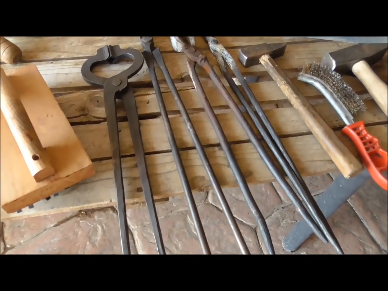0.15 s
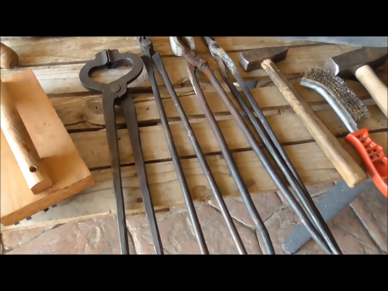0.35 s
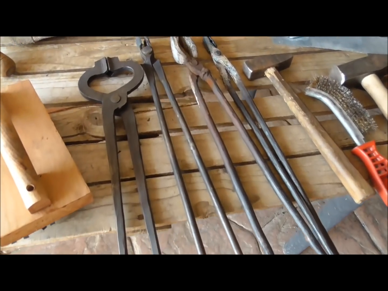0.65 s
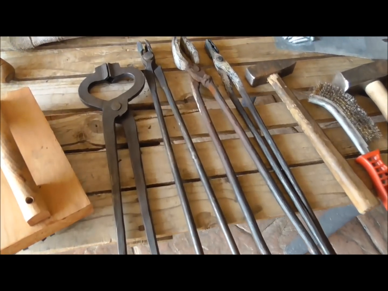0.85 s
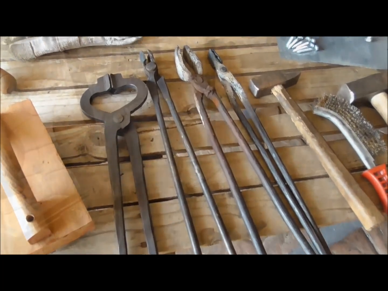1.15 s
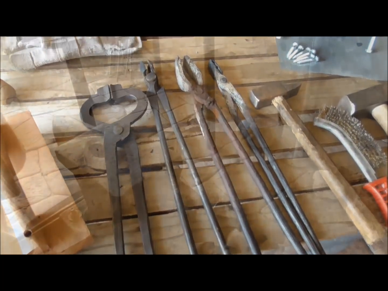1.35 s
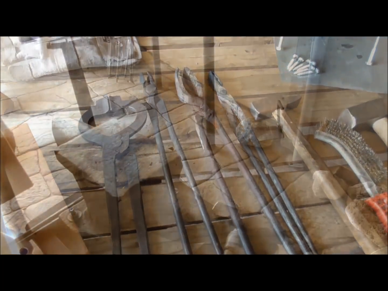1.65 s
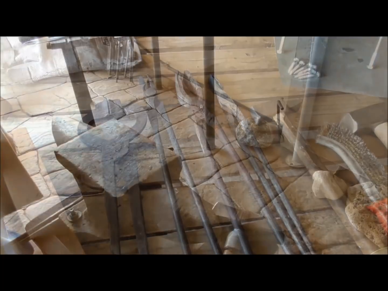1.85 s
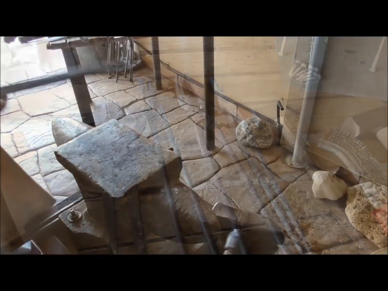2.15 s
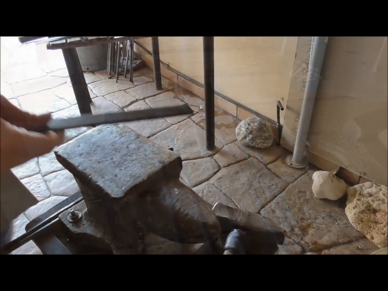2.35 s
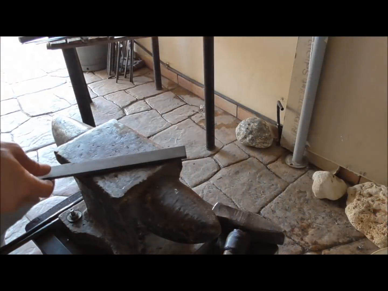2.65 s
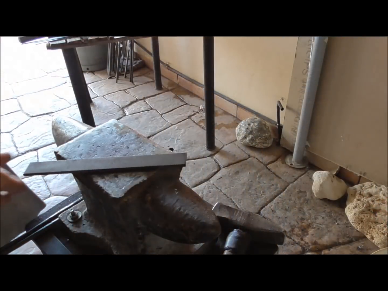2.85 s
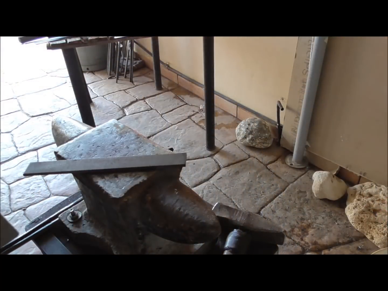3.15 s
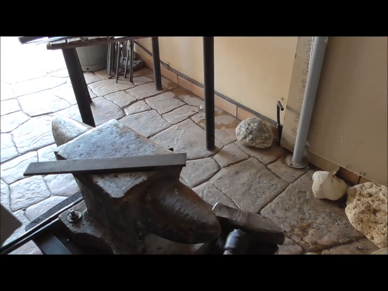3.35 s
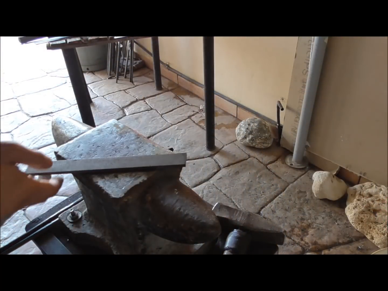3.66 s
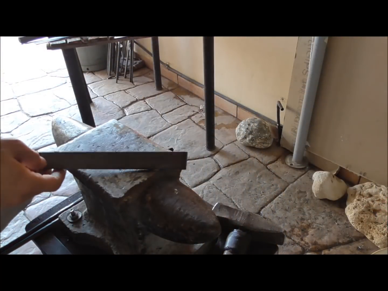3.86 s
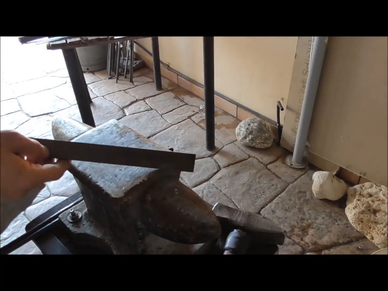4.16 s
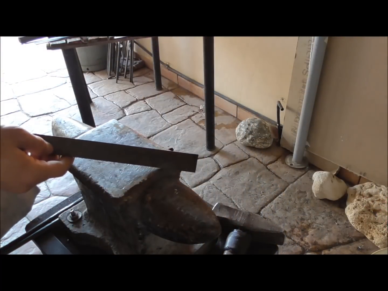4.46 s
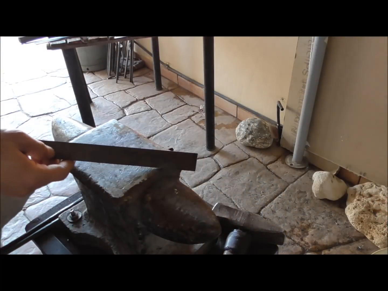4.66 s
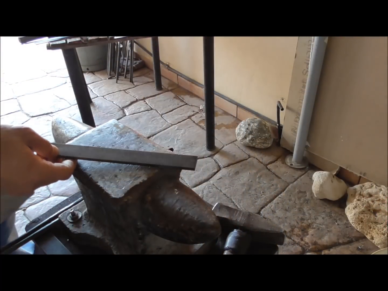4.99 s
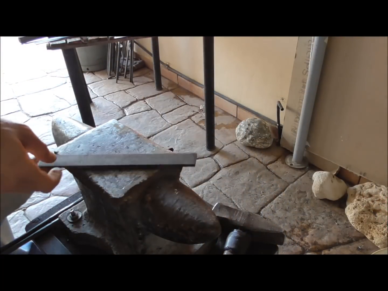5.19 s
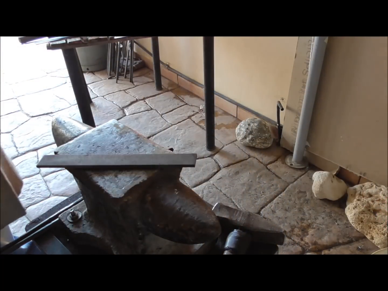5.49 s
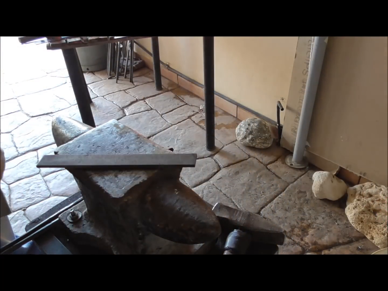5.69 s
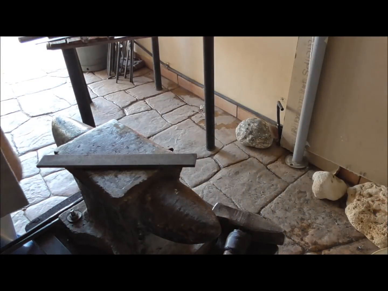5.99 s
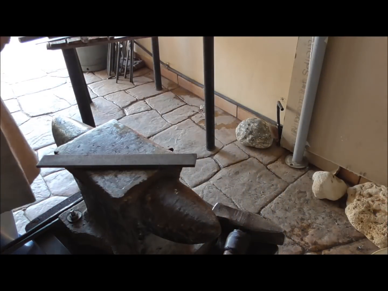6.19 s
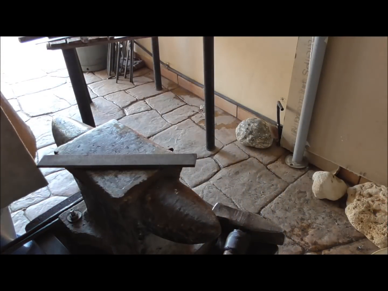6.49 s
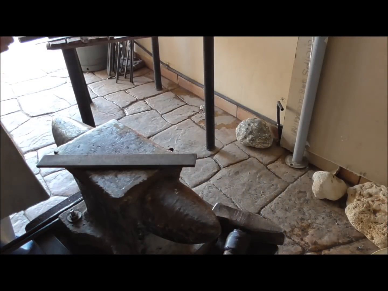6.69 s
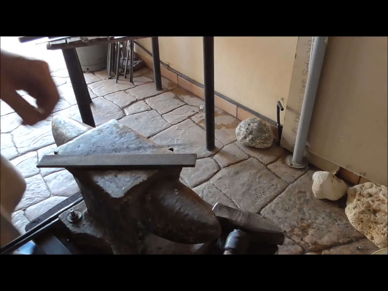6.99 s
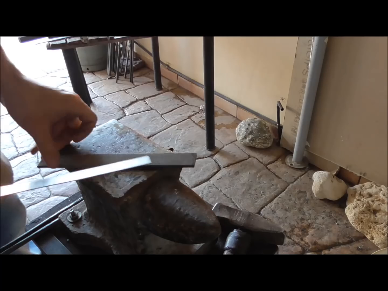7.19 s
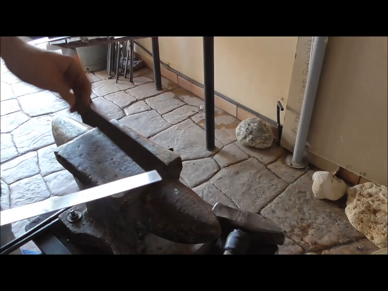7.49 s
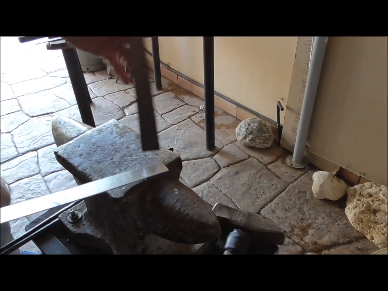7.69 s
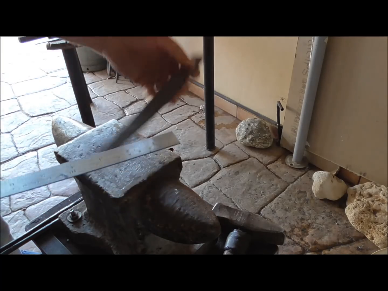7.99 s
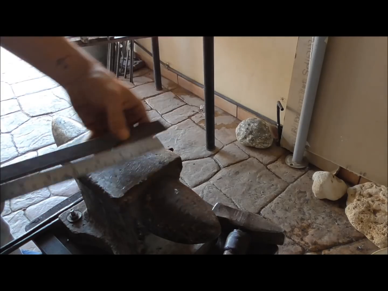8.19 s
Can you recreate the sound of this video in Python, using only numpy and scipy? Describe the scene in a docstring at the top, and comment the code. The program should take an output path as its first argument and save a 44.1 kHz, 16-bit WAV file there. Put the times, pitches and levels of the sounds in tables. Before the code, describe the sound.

A gas forge burner roars throughout, a thick low rush mostly between 150 and 500 Hz, with a thin jet hiss above and slight flutter. Soft, barely noticeable low thumps fall in the first 2.6 s. At 1.05 to 1.45 s loose metal tools knock and rattle, with a bright, high jingle. From about 1.1 s a second view of the roar, beside the anvil, fades in and thickens the sound; the bench view cuts off at 2.55 s. At 2.59 s a flat steel bar lands with a sharp, bright, short ring and chatter to 2.7 s, while the roar dips briefly and recovers. Faint taps come at 3.8 and 5.0 s, small clinks and slides at 5.3 to 5.4 s, a weak loose-metal knock near 6.0 s, a tiny roar dip at 6.6 s, then quiet scrapes and touches from 7.3 to 7.75 s. The roar continues to the end.

```python
"""A gas forge burner roars and hisses in a stone-floored workshop, built from shaped noise with slow level flicker.
It is heard from two spots: by the tool bench, then by the anvil, which fades in before the bench is cut off.
Loose metal knocks and rattles as noise bursts and ringing grit, mostly early on and once more near 6 s; soft
low thumps fall in the first seconds. A flat steel bar is laid, turned and slid on the anvil: its modes ring when
struck and when shaken by grit. The roar dips briefly around the first clink, and very slightly once more later."""
import sys
import numpy as np
from scipy import signal
from scipy.fft import rfft, irfft, next_fast_len
from scipy.io import wavfile

SR = 44100
rng = np.random.default_rng(int(sys.argv[2]) if len(sys.argv) > 2 else 0)


def to_wav(s):
    """Save 16-bit WAV."""
    ch = np.atleast_2d(s).T  # columns
    pcm = np.round(np.clip(ch, -1, 1) * 32767)  # PCM
    wavfile.write(sys.argv[1], SR, pcm.astype(np.int16))


N = 367794


def from_db(db):
    """Gain of a level in dB."""
    return 10 ** (np.asarray(db) / 20)


def rms_one(x):
    """Scales a sound to rms 1."""
    return x / np.sqrt(np.mean(x ** 2) + 1e-20)


def at_hz(points, hz):
    """Reads a curve drawn as straight lines on a log-frequency axis."""
    curve_hz, value = np.array(points).T
    return np.interp(np.log(hz), np.log(curve_hz), value)


def drift(rate):
    """Slow random wander of spread 1: noise low-passed at rate [Hz], made at every 40th sample."""
    r = np.exp(-2 * np.pi * rate * 40 / SR)
    noise = rng.standard_normal(N // 40 + 2002)
    slow = signal.lfilter([1], [1, -2 * r, r * r], noise)[2000:]  # drops the filter's start-up
    return np.interp(np.arange(N) / 40, np.arange(len(slow)), rms_one(slow))


def resonance(x, hz, width):
    """Two-pole resonance of a given width [Hz], gain close to 1 at its top."""
    r = np.exp(-np.pi * width / SR)
    feedback = [1, -2 * r * np.cos(2 * np.pi * hz / SR), r * r]
    return signal.lfilter([(1 - r * r) / 2, 0, (r * r - 1) / 2], feedback, x)


def grains(per_s, spread_db):
    """Random contacts of uneven size and either sign, independent in each channel; rms 1."""
    size_db = spread_db * np.minimum(rng.exponential(1, (2, N)), 5)
    sizes = from_db(size_db) * rng.choice([-1, 1], (2, N))
    return rms_one(sizes * (rng.random((2, N)) < per_s / SR) + 1e-9)


def strokes(start, length, level_db, rise, fall):
    """Level [dB] of each event at every sample: straight rise, hold, straight fall [dB per s]."""
    t, start, end = np.arange(N) / SR, np.c_[start], np.c_[start + length]
    return np.c_[level_db] - rise * np.maximum(start - t, 0) - fall * np.maximum(t - end, 0)


def add(out, at_s, piece):
    """Mixes a short sound in at a time [s]."""
    i = round(at_s * SR)
    out[:, i:i + piece.shape[-1]] += piece[..., :N - i]


# how alike left and right are: (frequency [Hz], correlation [1 = identical])
STEREO_LIKENESS = [(60, 0.85), (130, 0.97), (290, 0.97), (640, 0.91), (1410, 0.68), (3100, 0.65),
                   (6820, .4), (15000, 0.1)]


def coloured(spectrum, echoes=(), wet=0):
    """Stereo noise of a given spectrum, coloured by echo bands and a room tail, less alike in the treble; rms 1."""
    size = next_fast_len(N)
    hz = np.maximum(np.arange(size // 2 + 1) * SR / size, 1)
    level_db = at_hz(spectrum, hz)
    for echo_hz, width, echo_db in echoes:
        level_db = level_db + echo_db / (1 + (2 * (hz - echo_hz) / width) ** 2)
    # the room's dense tail ripples the upper spectrum finely
    tail_t = np.arange(SR // 4) / SR
    tail = rng.standard_normal((2, SR // 4)) * from_db(-60 * tail_t / 0.21)
    tail_spectrum = rfft(rms_one(tail), size) / np.sqrt(SR // 4)
    room = 1 + wet * tail_spectrum / (1 + (1300 / hz) ** 4)
    mid, side = rfft(rng.standard_normal((2, size))) * from_db(level_db) * room
    alike = np.clip(at_hz(STEREO_LIKENESS, hz), 0, 1)
    stereo = np.sqrt(1 + alike) * mid + np.sqrt(1 - alike) * side * [[1], [-1]]
    return rms_one(irfft(stereo, size)[:, :N])


# soft low thumps: (time [s], level before decay [dB])
LOW_THUMPS = [(0.199, -49), (0.369, -43), (0.539, -49), (1.054, -31), (1.478, -49), (2.27, -40),
              (2.549, -41)]


def thumps():
    """Soft low pushes: short dying 45 Hz tones, the same in both channels."""
    out, t = np.zeros((2, N)), np.arange(SR // 10) / SR
    for s, level_db in LOW_THUMPS:
        add(out, s, from_db(level_db) * np.sin(2 * np.pi * 45 * t) * from_db(-60 * t / .06))
    return out


# high ringing of small loose parts: (frequency [Hz], width [Hz], relative level [dB])
RATTLE_MODES = [(9600, 38, -11), (10200, 72, -4), (10500, 35, 9), (10900, 30, 10), (11300, 34, -1),
                (11400, 42, -8), (11900, 33, -7), (12300, 53, -6), (12200, 41, -11), (13100, 27, 1),
                (13500, 64, -10), (14000, 60, -10), (14400, 54, -11), (15000, 48, -18)]
# broad noise colour of the loose metal: (frequency [Hz], relative level per Hz [dB])
RATTLE_BODY = [(530, -22), (900, 2), (1780, -1.5), (2420, -7.5), (4390, -5.5), (6200, -8), (9080, -5.5),
               (11000, -15), (15500, -12)]
# bursts of rattle among the knocks: (start [s], length [s], ringing level [dB], broad level [dB])
RATTLE_BURSTS = [(1.064, .03, -43, -39.5), (1.128, .045, -37, -39), (1.19, .03, -35.5, -34),
                 (1.24, .09, -31.5, -39.5), (1.345, .07, -39, -44), (1.434, .03, -33, -44),
                 (6.002, .003, -41, -53)]
# knocks: (time [s], bright band level [dB], middle band re bright [dB], wooden body re bright [dB], t60 [s])
METAL_KNOCKS = [(1.052, -66, 22, 18, 0.12), (1.059, -35, -8, -12, 0.21), (1.1196, -31, -3, -4, 0.2),
                (1.131, -42, 3, 8, .16), (1.1804, -42, 9, 7, 0.17), (1.4306, -46, 2, -33, 0.13),
                (5.928, -53, -4, -20, 0.2), (5.9863, -53, -12, -20, 0.08), (6.0035, -44, -1, -24, 0.14)]
RATTLE_RISE_DB_PER_S, RING_FALL_DB_PER_S, BROAD_FALL_DB_PER_S = 700, 190, 143
LOOSE_WIDE = 0.16   # share of the opposite channel subtracted, which widens the high rattle


def loose_metal():
    """Knocks that die as noise, and a dense rattle of small parts ringing high."""
    grit = grains(3300, 2.3)
    ringing = rms_one(sum(from_db(db) * rms_one(resonance(grit, hz, width)) for hz, width, db in RATTLE_MODES))
    # the smallest parts blur into a wide bright band
    blur = rms_one(resonance(resonance(grit, 11300, 4000), 11300, 4000))
    ringing = rms_one(ringing + 1.1 * blur)
    ringing = rms_one(ringing - LOOSE_WIDE * ringing[::-1])
    broad = coloured(RATTLE_BODY)
    start, length, ring_db, broad_db = np.transpose(RATTLE_BURSTS)
    ring_db = strokes(start, length, ring_db, RATTLE_RISE_DB_PER_S, RING_FALL_DB_PER_S).max(axis=0)
    broad_db = strokes(start, length, broad_db, RATTLE_RISE_DB_PER_S, BROAD_FALL_DB_PER_S).max(axis=0)
    out = from_db(ring_db) * ringing + from_db(broad_db) * broad
    t = np.arange(SR // 2) / SR
    for s, level_db, middle_db, wood_db, t60 in METAL_KNOCKS:
        noise = rng.standard_normal((2, len(t)))
        bright = rms_one(resonance(resonance(noise, 10000, 4200), 10000, 4200))
        middle = from_db(middle_db) * rms_one(resonance(noise, 4600, 4500))
        wood = from_db(wood_db) * rms_one(resonance(resonance(noise[0], 1210, 800), 1210, 800))
        snap = 1 + .9 * from_db(-60 * t / 0.025)   # extra weight on the attack
        decay = from_db(level_db - 60 * t / max(t60, .01))
        add(out, s, decay * snap * (bright + middle + wood))
    return out


# pitch of each mode of the steel bar: (frequency [Hz])
BAR_MODE_HZ = [1190, 2406, 3962, 4780, 5922, 6150, 7273, 8199, 9841, 10850, 12550, 13850, 15340]
# family of each mode: 0 bending with a still middle, 1 bending with a moving middle, 2 twisting,
# 3 the two lowest, 4 low twisting, 5 edgewise bending, 6 high twisting: (family [index])
BAR_MODE_FAMILY = [3, 3, 0, 4, 1, 5, 2, 0, 2, 1, 6, 0, 6]
# one row per mode: (struck level [dB], free t60 [s], twin mode above by [Hz], rubbed level [dB])
BAR_MODES = [(-8, 0.32, 8.1, -7), (-2, 0.3, 16, -4), (-1, 0.38, 26, 3), (-2, 0.12, 11, -12),
             (-11, 0.58, 20.5, -3), (-9, .15, 23, -12), (-10, 0.17, 13, -8), (-3.5, 0.41, 21, -3.5),
             (-13.5, 0.2, 17, -5), (-6, 0.15, 29, -4.5), (-16, 0.15, 19, -5), (-29, .2, 22, -19),
             (-31, 0.2, 30, -22)]
# bar slides on the anvil face: (start [s], length [s], level [dB], brightness [dB per octave],
# moving-middle modes [dB], twisting modes [dB], two lowest modes [dB], low twisting mode [dB],
# edgewise mode [dB], high twisting modes [dB])
BAR_SLIDES = [(2.618, 0.077, -44, 0, -6, -5, -13, -6, 2, -9),
              (5.307, .03, -57, 8, -10, -2, -6, -6, -10, -6), (5.394, 0.03, -55, 8, -12, 0, 2, 3, -8, -4),
              (7.29, 0.09, -66, 0, 0, 5, -6, 0, 0, 6), (7.39, 0.02, -58, 0, 0, 2, -4, -4, -4, -10),
              (7.432, 0.04, -55, 3, -4, 9, 6, 2, 4, -4), (7.5, 0.04, -63, -4, 2, 6, -8, -4, 10, -6),
              (7.6, .04, -66, 0, 2, 0, -6, -4, 12, -6), (7.67, 0.08, -55, 12, 4, -7, 14, 8, -2, -12)]
SLIDE_RISE_DB_PER_S, SLIDE_FALL_DB_PER_S = 504, 322
BRIGHT_TOP_HZ = 12500   # brightness tilts the modes around 8 kHz, up to here


def slides():
    """Grit under the bar shakes its modes, each flickering unevenly, and they ring on briefly."""
    grit, rings = grains(2500, 1.0), 0
    start, length, slide_db, *colour = np.transpose(BAR_SLIDES)
    each_db = strokes(start, length, slide_db, SLIDE_RISE_DB_PER_S, SLIDE_FALL_DB_PER_S)
    level_db = each_db.max(axis=0)
    # the loudest slide at each moment sets the colour
    bright_db, *family_db = np.array(colour)[:, each_db.argmax(axis=0)]
    shaken = from_db(level_db) * (grit[0] + .5 * grit)
    for hz, family, (_, t60, _, rubbed_db) in zip(BAR_MODE_HZ, BAR_MODE_FAMILY, BAR_MODES):
        width = 12.0 / t60   # wider than the free mode, so it dies sooner
        spot_db = (0, *family_db)[family] + bright_db * np.log2(min(hz, BRIGHT_TOP_HZ) / 8000)
        flicker_db = 2.5 * drift(8)
        push = shaken * from_db(rubbed_db + spot_db + flicker_db)
        rings = rings + resonance(push, hz, width) * np.sqrt(SR / width)
    scrape = resonance(shaken, 6500, 5000)
    return 0.34 * rings + 0.17 * scrape


# bar meets anvil: (time [s], level [dB], brightness [dB per octave], ring time left by the grip [share],
# moving-middle modes [dB], twisting modes [dB], two lowest modes [dB], low twisting mode [dB],
# edgewise mode [dB], high twisting modes [dB], crack level [dB], crack pitch [Hz])
BAR_CLINKS = [(2.589, -21, 11, 0.7, -5.5, -6, -4, 1, -8, -8, 12, 5400),
              (2.631, -36, 7, 0.6, 2, -6, -6, -12, 0, -12, 10, 8000),
              (2.663, -42, 3, .5, -4, -8, -8, -3, 2, -5, 16, 6500),
              (2.675, -46, 0, .5, -2, -8, -10, -8, 0, -10, 15, 6500),
              (2.684, -36, 9, 0.45, -20, -10, -14, -12, -12, -16, 5, 7500),
              (3.824, -51, 6, 0.2, -16, -10, -15, -12, -10, -8, 2, 8000),
              (3.846, -60, 6, .2, -8, 4, -12, 0, -6, 18, 8, 12500),
              (5.014, -47, -5, 0.3, 3, 8, -14, -10, 0, 0, 0, 5400),
              (5.303, -54, 6, .3, -12, -3, -15, -8, -12, -8, 0, 8000),
              (5.326, -44, 3, 0.18, -12, 2, 2, -12, -12, 20, -2, 12000),
              (5.342, -55, -10, 0.33, -8, 13, -12, -8, -10, 16, 0, 5400),
              (5.398, -51, 10, 0.36, -12, 6, -6, 4, -8, 5, 2, 8000),
              (5.43, -52, -6, 0.22, -12, -10, -12, -15, -12, -15, -3, 5400),
              (7.287, -53, 3, 0.15, -4, 6, -20, -2, 2, 19, 9, 8000),
              (7.295, -60, -6, 0.2, -8, -4, -20, -8, -8, 0, 2, 5400),
              (7.355, -63, 6, .25, 0, 8, 14, 12, 0, 32, 12, 12500),
              (7.417, -54, -3, 0.22, 14, 4, 4, -10, 6, -8, 12, 5400),
              (7.46, -58, 0, 0.42, 0, 11, 16, -2, 8, -4, 2, 5400),
              (7.55, -60, -10, .25, -8, -8, -10, -2, 2, -8, 0, 5400),
              (7.659, -52, -4, 0.3, 4, -4, -12, -8, 0, -12, 2, 5400),
              (7.748, -58, 0, 0.35, 10, 6, 0, 4, -4, 26, 6, 11500)]
LIGHT_DB = -44   # touches below this level count as light
PRESS_DETUNE = .002   # relative spread: hand and anvil pull each mode off pitch at every light touch


def clinks():
    """Each touch cracks and rings every mode of the bar, which beats with a close twin as it dies."""
    out, t = np.zeros((2, N)), np.arange(SR // 4) / SR
    hz = np.c_[BAR_MODE_HZ]
    mode_db, t60, split_hz, _ = np.array(BAR_MODES).T[:, :, None]
    count = len(BAR_MODES)
    for s, level_db, bright_db, grip, *family_db, crack_db, crack_hz in BAR_CLINKS:
        tilt_db = bright_db * np.log2(np.minimum(hz, BRIGHT_TOP_HZ) / 8000)
        spot_db = np.c_[[0, *family_db]][BAR_MODE_FAMILY] + tilt_db
        strength = from_db(mode_db + spot_db + 1.5 * rng.standard_normal((2, count, 1)))
        # start phase in turns, close but not equal in the two channels
        turn = rng.random((2, count, 1))
        turn = turn[0] + .25 * turn
        detune = PRESS_DETUNE * (level_db < LIGHT_DB) * rng.standard_normal((count, 1))
        pitch = hz * (1 + detune)
        mode = np.sin(2 * np.pi * (pitch * t + turn))
        twin = np.sin(2 * np.pi * ((pitch + split_hz) * t + turn) + 0.81)
        decay = from_db(-60 * t / (t60 * max(grip, .05)))
        rings = np.sum(strength * decay * (mode - 0.63 * twin), axis=1)
        noise = rng.standard_normal((2, len(t)))
        crack = 1.3 * resonance(resonance(noise, crack_hz, 4000), crack_hz, 4000)
        # snap, then a noisy tail in the room
        crack = crack * (from_db(-60 * t / 0.014) + 0.088 * from_db(-60 * t / 0.21))
        add(out, s, from_db(level_db) * (rings + from_db(crack_db) * crack))
    return out


# the level at the anvil dips: (time the dip is deepest [s], depth [dB], hold [s])
ANVIL_DIPS = [(2.595, 13.5, 0.061), (6.643, 2, 0.022)]
DIP_FALL_S, DIP_RECOVER_S = 0.011, 0.083   # length of the fall, time constant of the recovery
FADE_IN_S, FADE_TIME_S = 1.06, 0.26   # fade-in start, time constant


def anvil_gain():
    """Fades the anvil spot in towards 1; each dip falls fast, holds and recovers."""
    t = np.arange(N) / SR
    gain = 1 - np.exp(-np.maximum(t - FADE_IN_S, 0) / FADE_TIME_S)
    for s, depth_db, hold in ANVIL_DIPS:
        fall = np.clip(1 + (t - s) / DIP_FALL_S, 0, 1)
        recovery = np.exp(-np.maximum(t - s - hold, 0) / DIP_RECOVER_S)
        gain = gain * from_db(-depth_db * fall * recovery)
    return gain


# flame roar at the anvil: (frequency [Hz], relative level per Hz [dB])
ANVIL_ROAR_SPECTRUM = [(15, -84.5), (25, -50), (80, -40.5), (121, -12.5), (181, -7), (220, -3), (331, 1),
                       (470, -6), (518, -23.5), (605, -21.5), (735, -29.5), (1340, -35.5), (2600, -57.5),
                       (3380, -56.5), (5720, -120)]
# jet hiss at the anvil: (frequency [Hz], relative level per Hz [dB])
ANVIL_HISS_SPECTRUM = [(700, -11), (1300, 8), (1700, 1), (2200, -7.5), (2900, -9), (4000, -6), (5000, -10),
                       (6200, -14), (8000, -12), (10000, -9), (12000, -12.5), (13500, -17), (14500, -20),
                       (15800, -24)]
# echoes cancel or lift narrow bands at the anvil: (frequency [Hz], width [Hz], change [dB])
ANVIL_ECHO_BANDS = [(70, 15, 8.5), (170.6, 8.1, -1), (188.5, 9.6, 5.5), (223, 11.8, -11.5), (346, 17, -1),
                    (366, 7.7, -4), (442.5, 14.5, -18.5), (470, 19, -0.5), (556, 31, -0.5), (589, 15, 3.5),
                    (647, 15.3, -8.5), (692, 50, 7.5), (716, 24.6, -11.5), (851, 37, -5), (870, 8.9, 3.5),
                    (943, 17, -6.5), (1017, 18, 8.5), (1036, 24, -23.5), (1157, 90, -4.5), (1410, 60, 3.5),
                    (1432, 18, -12), (1534, 30, 5.5), (2213, 110, -3), (2250, 140, 8.5)]
ANVIL_ROAR_DB, ANVIL_HISS_DB = -17, -52


def anvil_burner():
    """The same turbulent flame and gas jet from another side, as two flickering noises."""
    roar = coloured(ANVIL_ROAR_SPECTRUM, ANVIL_ECHO_BANDS, wet=0.81) * from_db(ANVIL_ROAR_DB + 1.1 * drift(11))
    hiss = coloured(ANVIL_HISS_SPECTRUM, wet=1.0) * from_db(ANVIL_HISS_DB + .8 * drift(20))
    return (roar + hiss) * anvil_gain()


# flame roar at the bench: (frequency [Hz], relative level per Hz [dB])
BENCH_ROAR_SPECTRUM = [(15, -75), (25, -63), (82, -24), (118, -26), (147, -5.5), (220, -3), (331, -3),
                       (358, -12), (452, -10.5), (571, -21), (1060, -39.5), (1800, -47), (2600, -60),
                       (3380, -75), (5720, -120)]
# jet hiss at the bench: (frequency [Hz], relative level per Hz [dB])
BENCH_HISS_SPECTRUM = [(1290, -37), (2200, 2), (2330, -20), (3230, -3), (3710, -1.5), (4100, -6.5),
                       (5020, -8.5), (6320, -14), (8980, -4.5), (13600, -12), (14800, -20), (15500, -12)]
# wall and floor echoes cancel or lift narrow bands: (frequency [Hz], width [Hz], change [dB])
BENCH_ECHO_BANDS = [(134, 16.7, -15.5), (160.8, 10.6, 7), (230.3, 8.5, 4), (268.4, 15.4, -10),
                    (308, 22, -5), (363, 24, 1), (410, 36, 5.5), (422, 28.4, -14.5), (474, 12.4, -18),
                    (475, 32, 6.5), (564, 14, -15), (675, 8.9, 4.5), (1055, 15, 12), (1284, 10, 11.5),
                    (1796, 200, -11.5), (3440, 370, -4), (9140, 280, 0)]
BENCH_ROAR_DB, BENCH_HISS_DB = -16, -50.5
BENCH_CUT_S, CUT_DB_PER_S = 2.545, 1800   # the bench spot is cut off


def bench_burner():
    """Turbulent flame and gas jet as two noises; the flame flutters slightly until the spot is cut off."""
    roar = coloured(BENCH_ROAR_SPECTRUM, BENCH_ECHO_BANDS, wet=0.99) * from_db(BENCH_ROAR_DB + .9 * drift(2.5))
    hiss = coloured(BENCH_HISS_SPECTRUM, BENCH_ECHO_BANDS, wet=0.37) * from_db(BENCH_HISS_DB + 0.32 * drift(7.8))
    cut_db = -CUT_DB_PER_S * np.maximum(np.arange(N) / SR - BENCH_CUT_S, 0)
    return (roar + hiss) * from_db(cut_db)


def scene():
    """Mixes the burner at both spots, the bar, the loose metal and the thumps."""
    burner = bench_burner() + anvil_burner()
    bar = (clinks() + slides()) * from_db([[0.8], [-0.8]])   # the bar lies left of centre
    return burner + bar + loose_metal() + thumps()


def record(dry):
    """Cuts the top steeply above 15.6 kHz."""
    low_pass = signal.ellip(10, .5, 70, 15600, fs=SR, output="sos")
    return signal.sosfilt(low_pass, dry)


dry = scene()
out = record(dry)
to_wav(out)
```